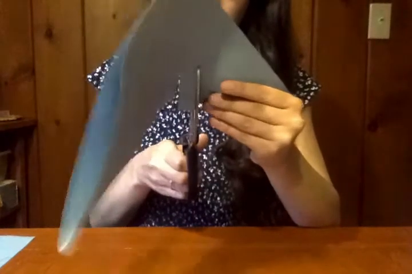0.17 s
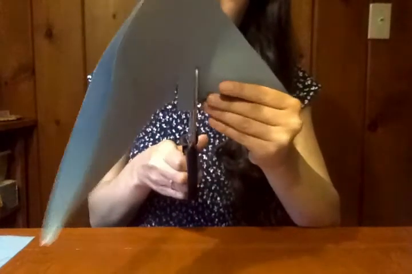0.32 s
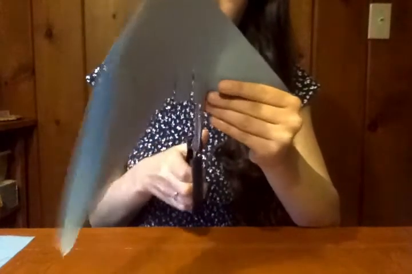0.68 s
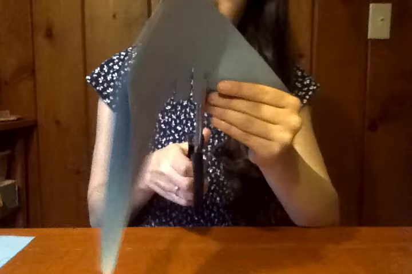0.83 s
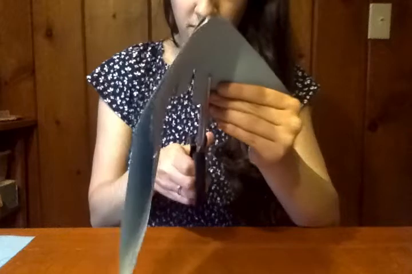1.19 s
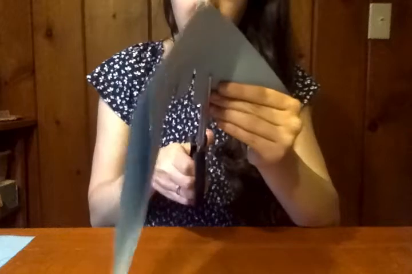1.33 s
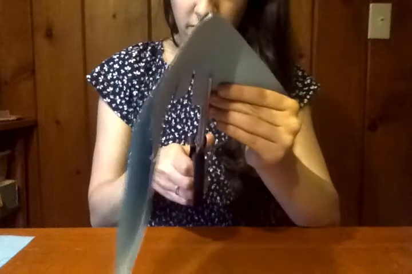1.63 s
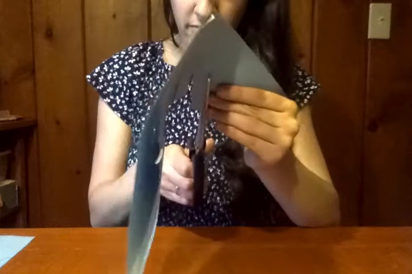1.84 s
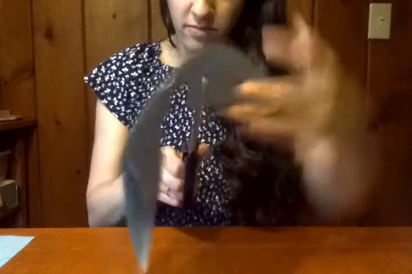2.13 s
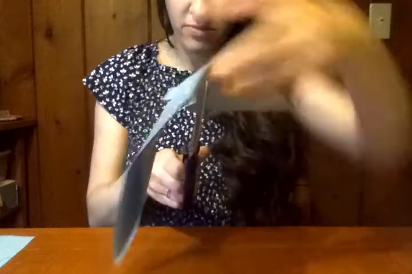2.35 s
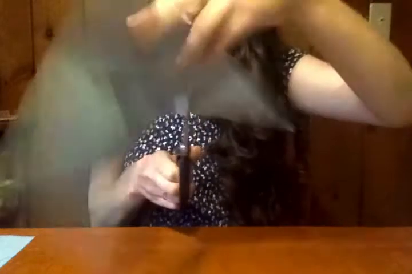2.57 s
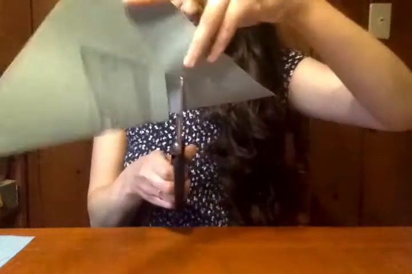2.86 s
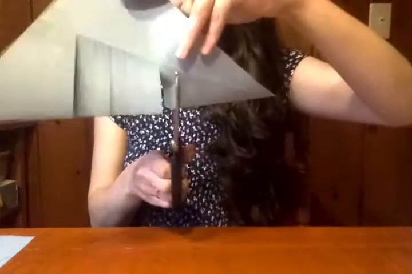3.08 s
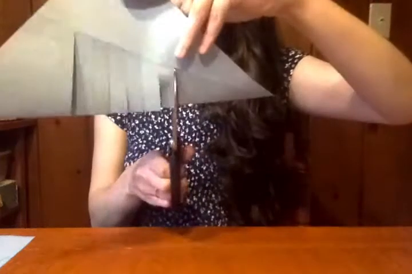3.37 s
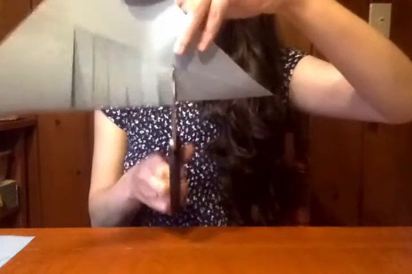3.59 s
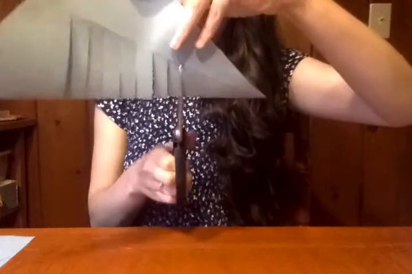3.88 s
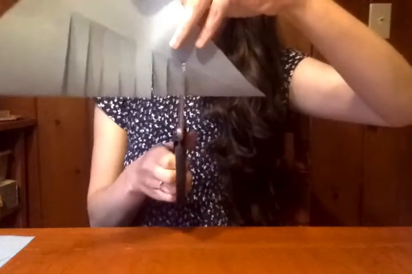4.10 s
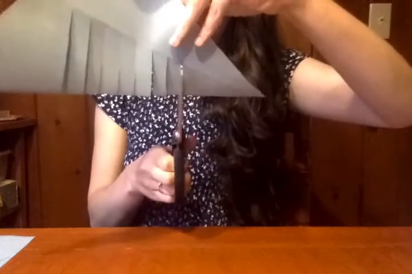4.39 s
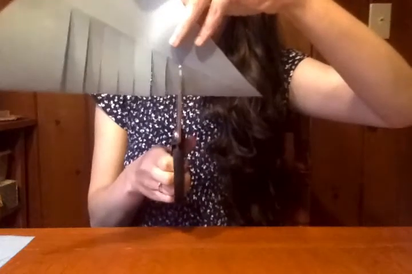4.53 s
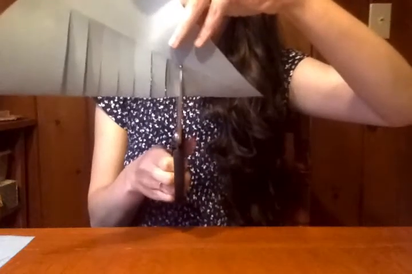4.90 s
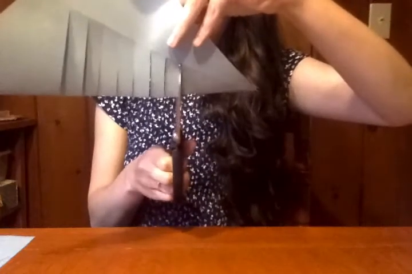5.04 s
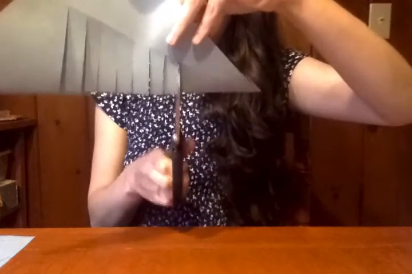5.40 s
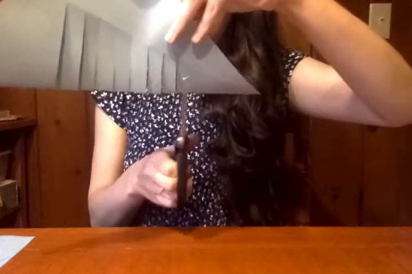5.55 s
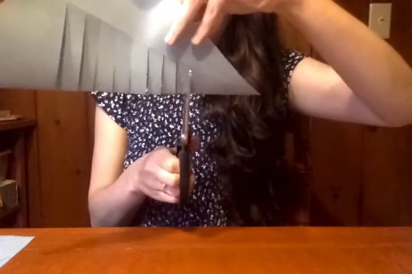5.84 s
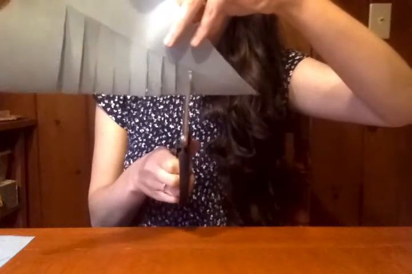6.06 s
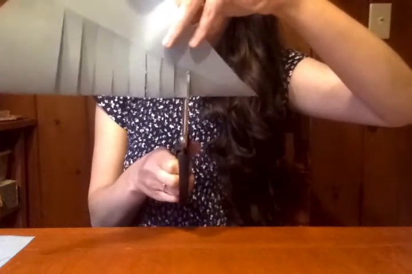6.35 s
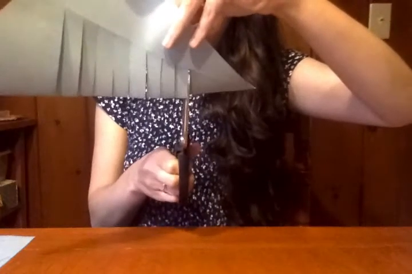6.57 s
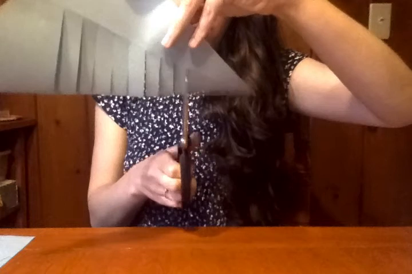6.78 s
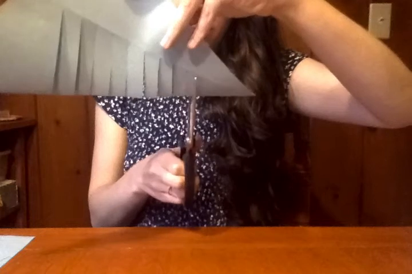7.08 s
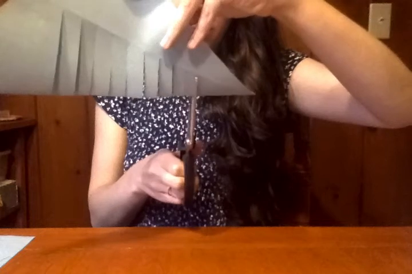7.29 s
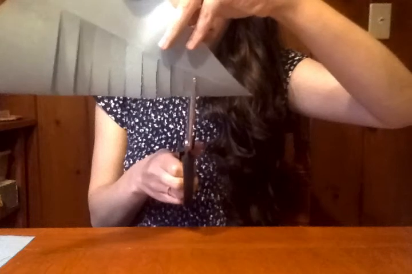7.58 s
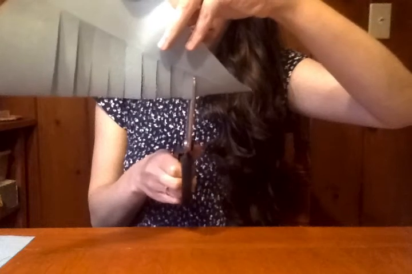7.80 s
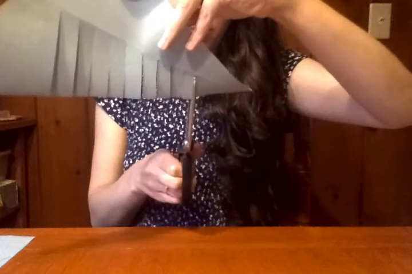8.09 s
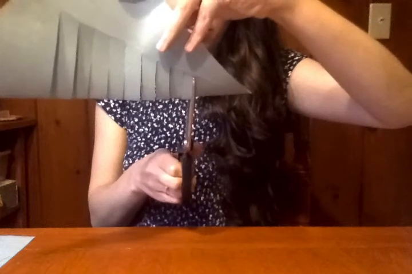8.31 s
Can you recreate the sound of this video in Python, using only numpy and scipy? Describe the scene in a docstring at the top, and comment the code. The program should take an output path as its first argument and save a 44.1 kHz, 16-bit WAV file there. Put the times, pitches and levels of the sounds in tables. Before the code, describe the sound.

A small dry room with faint hiss and a low wavering fan; scissors and paper are close to a small microphone that dulls the highest treble. A barely audible pivot squeak at 0.1 s, then a hard bright snap at 0.4 with a papery shiver, and a soft rub and dull knock near 0.6. Near quiet, with another very faint squeak at 1.4. From 1.8 crackles gather, with a lighter clack at 2.1; the sheet is handled until 3.4 in dense uneven crackles, boomy flaps and a dull knock at 2.7. A strong snap at 3.5, a lighter clack at 3.7, then faint rustle. From 4.7 crunching bites build to a snap at 5.3 and clack at 5.5. More gritty cutting from 6.2 leads to a sharp snap at 6.6 and clack at 6.9. Bites from 7.65 end in a snap at 7.9, then tiny crackles fade by 8.4.

```python
"""Scissors cut a sheet of paper held in front of a laptop microphone in a small panelled room. Cutting jerks
and handling of the sheet come as short bursts of crackling noise; snaps, opening clacks and dull knocks are
ringing modes with a crackle swelling into the blow and a noisy tail after it. Paper rubs on steel as grainy
filtered noise, and the pivot squeaks twice as a rough gliding tone. Decaying noise is the room's answer;
underneath lie shaped hiss and the noise humps of a fan."""
import sys
import numpy as np
from scipy import signal
from scipy.fft import rfft, irfft, next_fast_len
from scipy.io import wavfile
from scipy.ndimage import uniform_filter1d

SR = 44100
rng = np.random.default_rng(int(sys.argv[2]) if len(sys.argv) > 2 else 0)


def file_out(sig):
    """Save sig as 16-bit WAV at sys.argv[1]."""
    # one column per channel
    cols = np.atleast_2d(sig).T
    # limit, then scale
    lim = np.clip(cols, -1, 1)
    pcm = np.round(lim * 32767).astype(np.int16)
    wavfile.write(sys.argv[1], SR, pcm)


N = 371763


def bites():
    """Short crackling bursts, from cutting jerks and from handling the sheet."""
    # bursts of blade and paper: (start [s], length [ms], level [dB], centre [Hz],
    # sheet boom against the cut edge [dB])
    bursts = [(0.643, 5.5, -42, 3880, -13), (1.296, 6.5, -67.5, 6900, -23.5),
              (1.802, 8.2, -55.5, 5360, -22), (1.822, 14, -53, 5240, -24), (1.84, 13, -47, 6330, -24),
              (1.863, 4.2, -40, 5280, -26), (1.889, 21, -50.5, 3900, -18), (1.929, 3.9, -41.5, 5500, -12),
              (1.959, 6.9, -37.5, 4600, -31), (1.98, 5, -42.5, 3900, -27),
              (2.018, 13.5, -43.5, 3970, -19.5), (2.036, 4.6, -45.5, 3900, -20),
              (2.118, 2.03, -30, 4030, -4.5), (2.227, 12, -50.5, 4100, -3), (2.255, 4.9, -39, 6540, -12.5),
              (2.44, 4.8, -52.5, 8250, -24), (2.585, 12, -58.5, 4380, -16), (2.611, 3.3, -44.5, 6000, -29),
              (2.618, 5.7, -47, 5750, -6.5), (2.674, 7, -42, 6500, -16), (2.692, 3.8, -38.5, 5570, -5),
              (2.698, 4.7, -34, 4300, 5), (2.741, 16, -47, 4100, -11), (2.793, 16, -46.5, 4720, -3.5),
              (2.849, 6.9, -44, 4660, -0.5), (2.855, 4.6, -49.5, 4700, 4.5), (2.873, 4.9, -49, 4900, 1),
              (2.933, 6.8, -35, 4920, -11), (3.008, 6, -62, 5690, -5), (3.072, 4.3, -50.5, 5660, -15),
              (3.087, 5, -53, 4630, -9), (3.109, 6.9, -49, 3400, -14), (3.138, 6.1, -38.5, 4800, -12.5),
              (3.149, 2.4, -35, 6150, -16.5), (3.179, 7.2, -33.5, 4230, -20), (3.216, 6.2, -37, 6070, -3.5),
              (3.237, 11, -42, 4110, -5), (3.249, 5.4, -29.5, 2160, -21), (3.257, 19, -44.5, 4200, -5),
              (3.279, 6, -38.5, 4200, -5), (3.359, 11, -44, 4220, -17), (3.372, 9.4, -37, 5600, -16),
              (3.402, 4.5, -43, 5100, -20), (3.451, 6.6, -43, 4130, -18), (3.624, 2.6, -41, 4600, -13),
              (3.65, 18, -48, 5020, 3.5), (3.677, 7.5, -36, 5270, -37), (3.804, 7, -59.5, 4230, -0.5),
              (3.933, 11, -63, 5700, -11), (3.974, 13, -49, 5300, -18), (4.092, 26, -54.5, 5250, -11.5),
              (4.195, 49, -56.5, 3770, -6.5), (4.252, 26, -48, 4470, -18.5), (4.349, 19, -60.5, 5550, -11),
              (4.727, 13.4, -44.5, 4700, -19.5), (4.784, 11.6, -47, 4470, -16),
              (4.854, 12.4, -42.5, 4900, -20), (4.905, 13, -47.5, 4700, -13.5), (4.933, 17, -46, 5100, -14),
              (4.961, 24, -46.5, 4800, -21.5), (5.013, 17, -44, 4720, -17.5), (5.047, 7.6, -47, 4400, -28),
              (5.056, 18, -44, 4600, -17), (5.122, 10, -35, 4800, -18), (5.137, 7.2, -39.5, 3870, -11),
              (5.164, 4.1, -42, 3630, -17), (5.206, 4.8, -39.5, 4540, -15.5), (5.26, 8, -36, 4000, -19.5),
              (5.443, 47, -46, 4860, -5), (5.463, 12, -42, 4160, -3.5), (5.481, 13.2, -32, 6600, -8),
              (5.513, 8, -30.5, 5700, -6.5), (5.738, 6.5, -55, 4120, -7.5), (5.793, 4.5, -55, 4080, -3),
              (5.873, 16, -62.5, 4060, -7), (5.912, 14.5, -60, 4060, -17), (6.164, 6.5, -49, 5070, -31),
              (6.194, 17, -46, 4700, -23), (6.213, 12, -45, 5160, -21), (6.224, 16, -45.5, 4700, -26),
              (6.253, 11, -41, 4360, -13.5), (6.27, 7.9, -41, 4160, -25), (6.302, 8.3, -44.5, 5370, -11),
              (6.362, 8.3, -32.5, 6200, -13.5), (6.393, 7.5, -44, 6720, -25), (6.438, 18.2, -33, 4240, -18),
              (6.5, 4, -38, 5450, -17), (6.526, 5.7, -38, 4270, -31), (6.74, 32, -45.5, 4230, -6),
              (6.796, 4.1, -32, 4560, -6), (6.93, 7.4, -30.5, 5006, -9.5), (6.967, 6.2, -50, 3380, -7),
              (7.118, 8, -68, 4730, -8), (7.154, 2.2, -53, 5050, -13), (7.177, 10.9, -50, 5150, -23),
              (7.217, 10, -60, 4730, -14), (7.251, 24, -49.5, 4670, -24), (7.303, 22, -55, 4040, -16),
              (7.348, 15.6, -54.5, 4690, -11.5), (7.647, 10, -45, 4600, -19),
              (7.663, 13.5, -36, 4840, -15.5), (7.694, 8.7, -39, 5550, -9.5), (7.741, 6, -40.5, 3600, -14),
              (7.773, 9.2, -34, 4590, -16), (7.807, 11.5, -36, 3900, -8.5), (7.836, 6.2, -37, 6850, -6.5),
              (7.873, 5, -44, 5030, -9), (7.88, 6, -36, 5000, -13), (8.153, 7, -51.5, 2880, -30),
              (8.238, 4.3, -61.5, 4840, -9), (8.265, 4, -46.5, 5040, -9), (8.361, 20, -57, 3960, -10.5)]
    attack_ms, release_ms, peak_share = 0.97, 4.1, 0.37
    start_db, end_db = -8.5, -10.5  # under the peak
    lead_s = 0.008  # room for the attack ahead of the start
    out = np.zeros(N)
    ms = np.arange(-1000 * lead_s, 60, 1000 / SR)
    scatter = rng.standard_normal(len(bursts))
    for (start_s, length_ms, level_db, hz, boom_db), chance in zip(bursts, scatter):
        knots_ms = [-attack_ms, 0, peak_share * length_ms, length_ms, length_ms + release_ms]
        shape_db = np.interp(ms, knots_ms, [-48, start_db, 0, end_db, -58])
        # louder bursts are brighter, and each differs a little
        fine_db = -5 + 0.6 * (level_db + 36.5) + 3 * chance
        add(out, start_s - lead_s, tear(hz, boom_db, fine_db, undb(level_db + shape_db)))
    return out


def tear(hz, boom_db, fine_db, shape):
    """A short run of crackle; light touches sing in the blade's resonances, firm ones crunch broadly."""
    # narrow blade resonances that a light touch wakes: (pitch [Hz])
    edge_hz = (4100, 5000, 5800, 6500)
    fibres = crackle(len(shape), spread_db=2.5)
    firm = np.clip(np.log10(shape.max()) + 2.9, 0, 1)  # 0 at a peak of -58 dB, 1 at -38 dB
    edge = sum(undb(4 * rng.standard_normal()) * band(fibres, f, 260) for f in edge_hz)
    crunch = unit(band(fibres, 5000, 4700))
    cut = unit(band(fibres, hz, (.1 + .3 * firm) * hz))
    tone = cut + (.3 + 1.3 * firm) * crunch + .8 * (1 - firm) * unit(edge)
    return shape * paper(fibres, tone, boom_db, fine_db)


def paper(fibres, tone, boom_db, fine_db):
    """One excitation heard three ways: the cut edge, the broad sheet below it, fine tearing above it."""
    boom = band(fibres, 1100, 1500)
    fine = band(fibres, 13000, 10000)
    return unit(tone) + undb(boom_db) * unit(boom) + undb(fine_db) * unit(fine)


def snaps():
    """Scissors clack shut or open, or a duller knock; crackle swells into the blow and a noisy tail follows."""
    # snaps, opening clacks and dull paper knocks: (time [s], peak of the ring [dB], # thud against the ring
    # [dB], crackle around the blow [dB], tail offset against the ring [dB])
    blows = [(0.3824, -10, -19.5, -26, 1), (0.647, -44, 12.5, -47, -6), (2.0873, -19, -22, -45, 3.5),
             (2.113, -41, 11.5, -50, -3), (2.7116, -31.5, 7.5, -50, -6), (3.4838, -9.5, -15, -26.5, 2.5),
             (3.6928, -15.5, -16, -31, -7), (5.3049, -10, -16.5, -25, 2.5), (5.527, -18, -19, -32, -6),
             (6.5708, -8.5, -21, -28, 2), (6.8565, -16.5, -24, -30, -4.5), (7.8901, -11, -19, -26.5, 3)]
    # nominal modes of the blades: (pitch [Hz], relative level [dB], t60 [s])
    blade_modes = [(2750, -8, .009), (3600, -9, .008), (5050, -2, .010), (5900, -1, .010), (7000, -8, .007),
                   (8300, -4, .007), (10600, -2, .005), (15000, -3, .005)]
    # nominal modes of the handles: (pitch [Hz], relative level [dB], t60 [s])
    handle_modes = [(248, 5.5, 0.018), (460.5, -2, 0.06), (595, -2, 0.036), (920, 9.5, 0.0065),
                    (1542, 5.5, 0.022), (2064, -6.5, 0.051)]
    # a noisy tail dies out after each blow: (centre [Hz], level before the blow's offset [dB], t60 [s])
    tail_bands = [(1240, -41, 0.11), (2760, -30.5, 0.2), (3950, -35.5, 0.27), (7100, -30, 0.32),
                  (8300, -31, 0.16), (13000, -36.5, 0.33)]
    lead_s = 0.008  # the crackle begins this long before the blow and is loudest at it
    out = np.zeros(N)
    t = np.arange(SR // 3) / SR
    swell_db = np.interp(t, [0, .003, .005, lead_s, .012, .016, .03], [-45, -22, -4, 0, -8, -22, -100])
    for blow_s, peak_db, thud_db, crackle_db, tail_db in blows:
        add(out, blow_s - lead_s, tear(4800, -12, -1.5, undb(crackle_db + swell_db)))
        blow = ring(blade_modes) + undb(thud_db) * ring(handle_modes)
        add(out, blow_s, undb(peak_db) * blow)
        fibres = crackle(len(t), spread_db=2.0)
        noise_tail = 0
        for hz, band_db, t60 in tail_bands:
            decay = 1000. ** (-t / t60)
            gain = undb(peak_db + tail_db + band_db)
            noise_tail = noise_tail + gain * unit(band(fibres, hz, 0.65 * hz)) * decay
        add(out, blow_s, noise_tail * np.clip(t / .004, 0, 1))  # 4 ms onset
    return out


def ring(modes):
    """Free decay of modes after one blow, each caught differently, neighbours in opposite sense; peak 1."""
    t = np.arange(SR // 10) / SR
    y = 0
    for k, (hz, db, t60) in enumerate(modes):
        gain = (-1) ** k * undb(db + 3.5 * rng.standard_normal())
        pitch_hz = hz * (1 + .04 * rng.standard_normal())
        y = y + gain * np.sin(2 * np.pi * pitch_hz * t) * 1000. ** (-t / t60)
    return y / np.abs(y).max()


def slide():
    """Paper rubs on steel: grainy strokes of uneven level, many swelling and sagging, some broken off."""
    # paper rubbing on steel, one row a stroke: (start knot [s], hardest knot [s], end knot [s],
    # level [dB], sheet boom against the rub [dB], fine tearing before the common lift [dB])
    strokes = [(-.02, -0.003, 0.026, -51.5, -6.5, -23), (0.522, 0.569, 0.65, -44.5, -14.5, -21.5),
               (1.392, 1.45, 1.59, -71.5, -4, -18.5), (1.851, 1.96, 2, -50.5, -19.5, -28),
               (2.07, 2.21, 2.296, -49.5, -20, -25), (2.6, 2.67, 2.91, -51.5, -6.5, -20.5),
               (2.937, 2.941, 2.97, -49.5, -2.5, -33), (2.978, 3, 3.1, -67, -3, -15),
               (3.188, 3.19, 3.1, -47, -12, -31), (3.358, 3.372, 3.43, -48, -13, -22),
               (3.63, 3.673, 3.606, -45, -7, -13), (3.99, 4.006, 4.01, -60.5, -7, -28),
               (4.067, 4.08, 4.13, -66, -9, -23), (5.006, 5.025, 5.36, -60.5, -20, -24),
               (5.439, 5.496, 5.317, -44, 3, -22), (6.212, 6.26, 7.2, -64, -6, -24),
               (6.745, 6.83, 7, -47, -10, -17), (7.662, 7.67, 7.7, -49.5, -10, -32)]
    # bands of the rubbing: (centre [Hz], width of one filter pass [Hz], mean level [dB])
    rub_bands = [(2000, 570, 0.5), (3800, 2100, 1.5), (5000, 3770, 7.5), (7300, 1100, -6)]
    attack_s, release_s = 0.0058, 0.06
    start_db, end_db = -9.5, -9.5  # under the hardest knot
    fine_lift_db = 16.5  # common to all strokes
    t = np.arange(N) / SR
    fibres = np.clip(crackle(N, spread_db=3.5), -7, 7)
    stroke_levels = []
    for start, hardest, end, peak_db, *_ in strokes:
        knots_s = [start - attack_s, start, hardest, end, end + release_s]
        stroke_levels.append(peak_db + np.interp(t, knots_s, [-50, start_db, 0, end_db, -50]))
    level_db = np.max(stroke_levels, axis=0)  # the loudest stroke wins
    rows = np.array(strokes)
    edges_s = rows[:, [0, 2]].ravel()
    boom_db = np.interp(t, edges_s, np.repeat(rows[:, 4], 2))
    fine_db = np.interp(t, edges_s, np.repeat(rows[:, 5], 2)) + fine_lift_db
    tone = sum(undb(db + 3 * walk(90)) * unit(band(fibres, hz, width)) for hz, width, db in rub_bands)
    catch_db = 3 * np.clip(walk(250), -1.5, 3)  # uneven grain, as if catching on single fibres
    return undb(level_db + catch_db) * paper(fibres, tone, boom_db + 4 * walk(90), fine_db)


def squeak():
    """Brief, rough notes from the turning joint; pitch follows a parabola through three points."""
    # the pivot: (from [s], to [s], pitch at start [Hz], at middle [Hz], at end [Hz], level [dB])
    notes = [(.121, .176, 3300, 3280, 3400, -63), (1.4, 1.475, 3300, 3800, 2950, -72)]
    attack_s, release_s, rough_hz = .003, .006, 550
    t = np.arange(N) / SR
    out = 0
    for t0, t1, start_hz, middle_hz, end_hz, db in notes:
        u = np.clip((t - t0) / (t1 - t0), 0, 1)
        hz = start_hz * (1 - u) * (1 - 2 * u) + middle_hz * 4 * u * (1 - u) + end_hz * u * (2 * u - 1)
        shape = np.interp(t, [t0, t0 + attack_s, t1, t1 + release_s], [0, 1, .6, 0])
        rough = walk(rough_hz) + 1j * walk(rough_hz)  # random amplitude and phase
        tone = np.real(rough * np.exp(2j * np.pi * np.cumsum(hz) / SR))
        out = out + undb(db) * shape * tone
    return out


def room(x):
    """Dense reflections from near walls that die away band by band."""
    # decay of the room: (centre [Hz], level before the common wet trim [dB], t60 [s])
    room_bands = [(303, -28.5, 0.16), (1080, -28.5, 0.2), (3260, -23, 0.27), (5540, -33, 0.35),
                  (10600, -13.5, 0.1)]
    wet_trim_db = -19.0
    t = np.arange(SR // 2) / SR
    tail = 0
    for hz, wet_db, t60 in room_bands:
        decay = unit(band(rng.standard_normal(len(t)), hz, 0.95 * hz)) * 1000. ** (-t / t60)
        tail = tail + undb(wet_db + wet_trim_db) * decay
    onset = np.clip(t / 0.0059 - .4, 0, 1)  # silent for 2.4 ms, full at 8.3 ms
    return signal.fftconvolve(x, tail * onset)[:N]


def air():
    """Broad room tone with the fan's wavering noise humps, all following one slow level curve."""
    # spectrum of the room tone: (frequency [Hz], relative density [dB per Hz])
    tone_curve = [(25, -42.5), (60, -3.5), (150, -9), (400, -9), (900, -17.5), (1600, -22.5), (3000, -22),
                  (7000, -27.5), (17000, -24.5)]
    # the fan's humps: (centre [Hz], width of one filter pass [Hz], mean level [dB])
    humps = [(238.8, 95, -72), (800, 30, -85.5), (2000, 130, -79.5), (2780, 100, -85.5)]
    # level curve, heard relative to the mean of its points: (time [s], level [dB])
    level_curve = [(0.0, -68.5), (0.7, -66), (1.41, -74), (2.25, -66.5), (8.43, -68.5)]
    s, db = np.transpose(level_curve)
    hiss = unit(colour(rng.standard_normal(N), tone_curve)) * undb(-68.0)
    fan = 0
    for hz, width, hump_db in humps:
        fan = fan + undb(hump_db + walk(12)) * unit(band(rng.standard_normal(N), hz, width))
    drift_db = np.interp(np.arange(N) / SR, s, db) - np.mean(db)
    return (hiss + fan) * undb(drift_db)


def undb(db):
    """Decibels to gain."""
    return 10 ** (np.asarray(db) / 20)


def unit(x):
    """Scale to rms 1."""
    return x / np.sqrt(np.mean(x ** 2))


def band(x, hz, width):
    """Two-pole resonance applied twice; width in Hz is that of one pass."""
    b, a = signal.iirpeak(hz, hz / width, fs=SR)
    return signal.lfilter(b, a, signal.lfilter(b, a, x))


def colour(x, points):
    """Shape the spectrum by (Hz, dB) points, with the causal (minimum) phase of that gain."""
    size = next_fast_len(x.shape[-1] + SR // 10)
    hz, db = np.transpose(points)
    grid_hz = np.arange(1, 2050) * SR / 4096
    log_gain = np.interp(np.log(grid_hz), np.log(hz), db) * np.log(10) / 20
    ceps = irfft(log_gain)
    ceps[1:2048] *= 2  # fold the cepstrum onto positive times
    ceps[2049:] = 0
    impulse = irfft(np.exp(rfft(ceps)))
    return irfft(rfft(x, size) * rfft(impulse, size), size)[..., :x.shape[-1]]


def crackle(size, spread_db):
    """Noise of snapping fibres: a few are far louder than the rest."""
    return unit(rng.standard_normal(size) * undb(spread_db * rng.exponential(size=size)))


def walk(rate):
    """Random levels held 1 / rate s and slewed twice; rms 1."""
    k = int(SR / rate)
    steps = np.repeat(rng.standard_normal(N // k + 1), k)
    return unit(uniform_filter1d(uniform_filter1d(steps, k), k)[:N])


def add(out, s, sound):
    """Mix a short sound in at s seconds."""
    i = int(s * SR)
    out[i:i + len(sound)] += sound[:len(out) - i]


def scene():
    """Scissors and paper close by, their room, and the air."""
    near = bites() + snaps() + slide() + squeak()
    return (near + room(near) + air())[None]


def record(dry):
    """A small capsule behind a port, with dips in the treble and a steep top."""
    # response of the microphone: (frequency [Hz], gain [dB])
    response = [(30, -26.5), (80, -7), (200, 1.5), (7000, 2.5), (8500, -6.5), (9300, -17), (11500, -7.5),
                (13500, -13.5), (15500, -12)]
    top_hz = 16100
    steep_top = signal.ellip(8, .2, 70, top_hz, fs=SR, output="sos")
    return signal.sosfilt(steep_top, colour(dry, response))


dry = scene()
out = record(dry)
file_out(out)
```